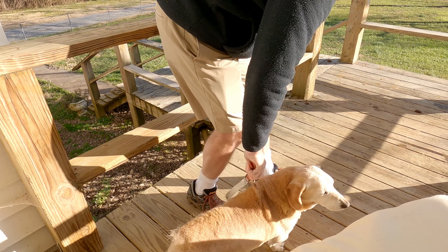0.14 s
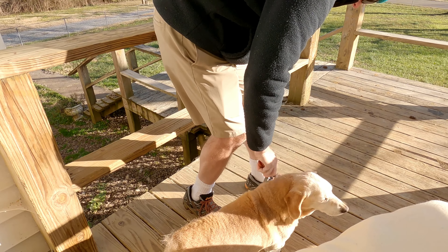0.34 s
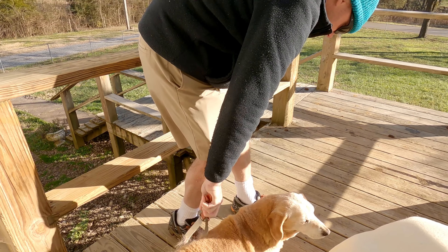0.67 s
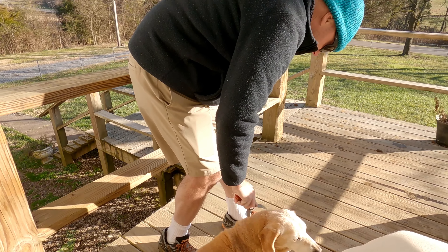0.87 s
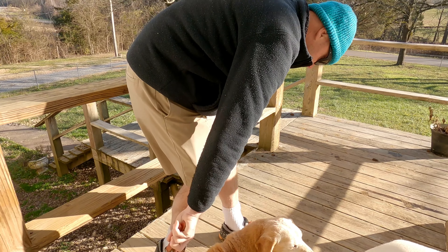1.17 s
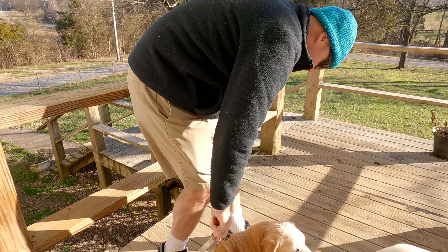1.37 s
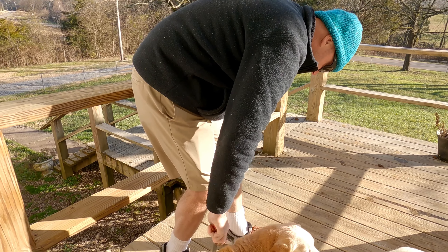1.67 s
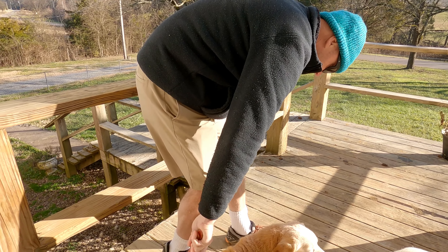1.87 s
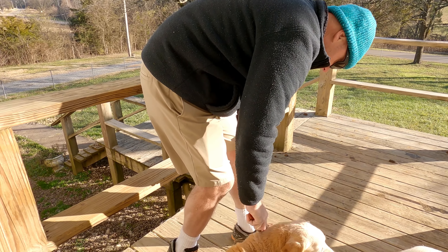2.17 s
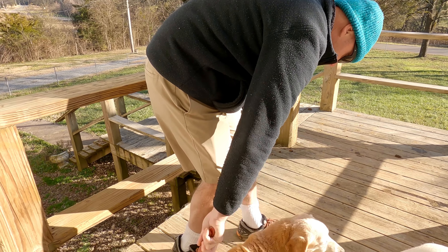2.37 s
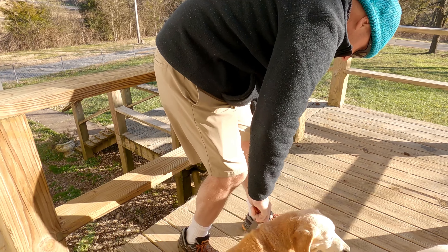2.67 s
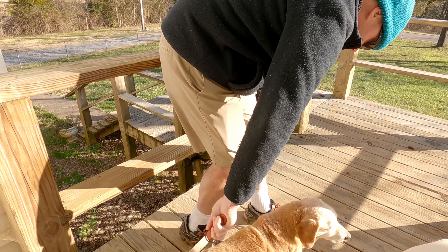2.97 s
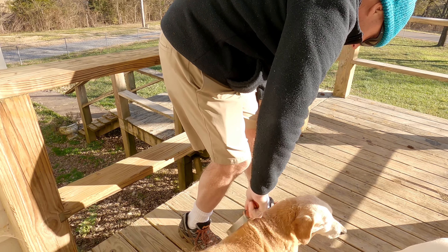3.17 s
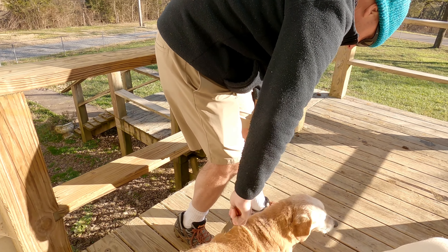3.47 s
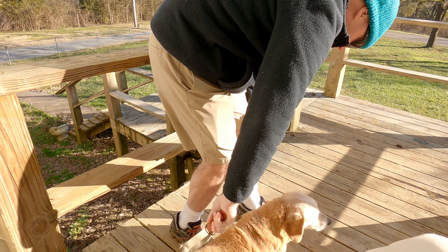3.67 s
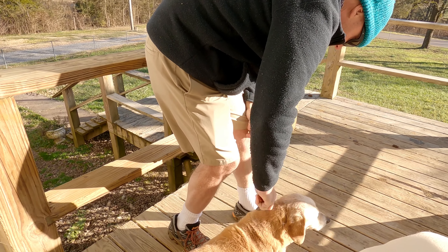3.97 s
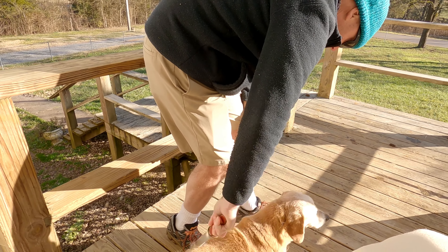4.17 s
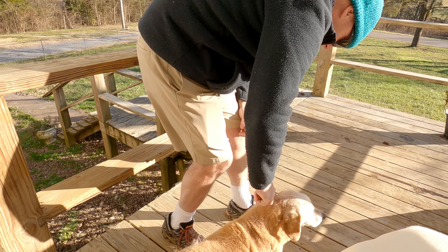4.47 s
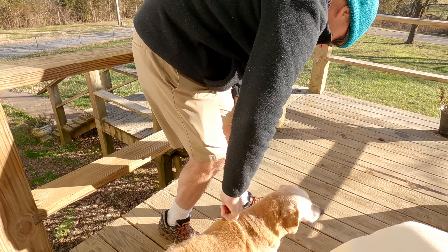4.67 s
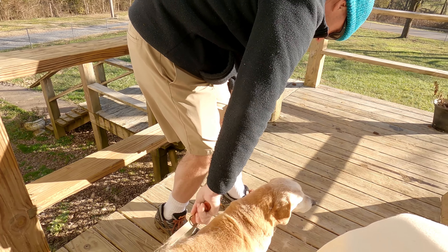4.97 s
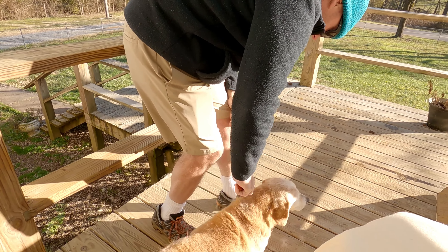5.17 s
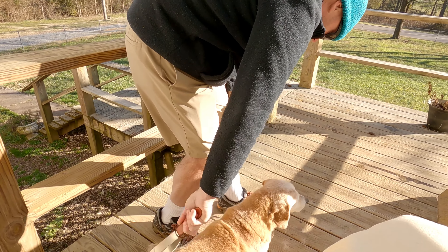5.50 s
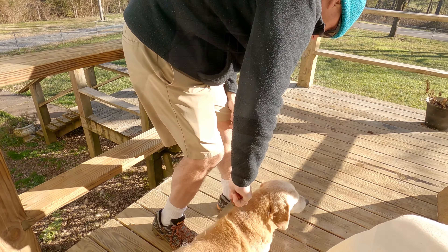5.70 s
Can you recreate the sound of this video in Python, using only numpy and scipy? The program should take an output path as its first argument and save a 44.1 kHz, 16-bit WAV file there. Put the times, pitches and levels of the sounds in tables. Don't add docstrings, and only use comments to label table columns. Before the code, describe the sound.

Close up, a metal pin comb scrapes to and fro through a dog's coat about three times a second. Each stroke hisses with dry hair and thin, high metallic ringing; caught pins ping free and the handle or collar ticks. Behind it, on an open wooden deck, small birds chirp faintly, a distant engine hums and deep traffic rumbles. The stereo microphone sits near the dog.

```python
import sys
import numpy as np
from scipy import signal
from scipy.fft import rfft, irfft
from scipy.io import wavfile
from scipy.ndimage import uniform_filter1d

SR = 44100
rng = np.random.default_rng(int(sys.argv[2]) if len(sys.argv) > 2 else 0)


def unload_audio(sound):
    columns = np.transpose(np.atleast_2d(sound))
    steps = np.round(np.clip(columns, -1, 1) * 32767)
    wavfile.write(sys.argv[1], SR, steps.astype(np.int16))


def attenuation_scalar(level_db):
    decades = np.asarray(level_db, float) / 20
    return 10 ** decades


N = 257544
SLOW = np.arange(0, N + 64, 64) / SR
FIRM_DB = -60

# pins bite t/s, hardest t/s, pins lift t/s, bite level/dB, hardest level/dB
COMB_STROKES = [(.099, .218, 0.3, -65, -61), (.396, .518, 0.58, -69.3, -58.5),
                (.744, .838, .898, -62.5, -62.7), (.985, 1.128, 1.194, -69.5, -60),
                (1.322, 1.464, 1.58, -67.7, -61.7), (1.663, 1.779, 1.825, -65.5, -57),
                (1.944, 2.041, 2.22, -72, -64), (2.213, 2.351, 2.47, -71, -56),
                (2.584, 2.677, 2.798, -62, -61), (2.893, 2.982, 3.021, -60, -55),
                (3.134, 3.258, 3.34, -67.5, -61), (3.45, 3.615, 3.642, -62.5, -57),
                (3.77, 3.824, 4, -73, -64.5), (4.0, 4.165, 4.29, -71, -57),
                (4.363, 4.412, 4.51, -66.3, -62.5), (4.61, 4.862, 4.887, -66.5, -51.5),
                (4.976, 5.137, 5.26, -72, -62.5), (5.322, 5.41, 5.525, -62, -54.5),
                (5.625, 5.776, 5.96, -70.5, -60.5)]
# t/s, half length/s, extra pressure level/dB
KNOT_TUGS = [(.1, 0.011, 2.5), (0.731, 0.013, 2), (1.06, .02, 2.5), (1.715, 0.012, 2.5),
             (1.945, 0.011, 4.5), (2.265, .02, 3), (2.59, .015, 2.5), (2.887, 0.011, 2.5), (3.0, 0.016, 1),
             (3.295, 0.01, 1), (3.62, .025, 1.5), (3.864, 0.014, 0), (4.087, 0.013, 4), (4.155, .012, 3),
             (4.674, .02, 3.5), (5.33, 0.012, 2), (5.507, 0.027, 1.5)]


def hand():
    attack_db_per_s, ease_db, release_db_per_s = (180, 288), (-15.5, -6.5), (101, 274)
    power, pull, progress = 0, 0, 0
    for k, (bite, hardest, lift, bite_db, top_db) in enumerate(COMB_STROKES):
        way = k % 2
        end_db = top_db + ease_db[way]
        times = [bite - 1, bite, hardest, lift, lift + 1]
        before_db = bite_db - attack_db_per_s[way]
        after_db = end_db - release_db_per_s[way]
        now = attenuation_scalar(2 * np.interp(SLOW, times, [before_db, bite_db, top_db, end_db, after_db]))
        power = power + now
        pull = pull + way * now
        progress = progress + now * np.interp(SLOW, [bite, lift], [0, 1])
    pressure_db = 10 * np.log10(power) + bumps_db(KNOT_TUGS)
    return fine(pressure_db), fine(pull / power), fine(progress / power)


# f/Hz, level/dB per Hz
HAIR_SPECTRUM = [(290, -33), (500, -17), (902, -1.5), (955, -6.5), (1900, -8.5), (2110, -5), (3590, -6.5),
                 (9530, -5), (12900, -12.5), (15500, -20.5)]


def hair(scratch_db, pull):
    over_db = scratch_db - FIRM_DB
    rub_db = by_way((-64, -63.5), pull) + 0.7 * over_db
    fizz_db = by_way((-67.5, -67.5), pull) + 1.4 * over_db
    tangles = evened(attenuation_scalar(0.8 * drift(0.02) + 0.6 * drift(0.002)))
    rub = attenuation_scalar(rub_db + 3.0) * noise(HAIR_SPECTRUM, 870, 6380, patchy_db=1.45, size=256)
    scratch = attenuation_scalar(scratch_db - 2.5) * noise(HAIR_SPECTRUM, 8100, 9000, patchy_db=0.0, size=256)
    fizz = attenuation_scalar(fizz_db + 6.0) * noise(HAIR_SPECTRUM, 10200, 20000, patchy_db=2.5, size=256)
    return tangles * (rub + scratch + fizz)


# f/Hz, width f/Hz, level/dB
PIN_NOTES = [(6200, 13, -0.5), (6995, 65, 2.5), (7844, 56, 1.5), (8540, 43, -2), (9150, 67, -2),
             (9990, 78, -.4), (10400, 46, -23), (10750, 70, -3.5), (11000, 110, -2), (11700, 50, -0.5),
             (12450, 50, -2), (13450, 55, -2), (13900, 80, -9), (14400, 81, -27)]


def pins(scratch_db, pull, progress):
    bite_hz = by_way((9100, 7400), pull)
    lift_hz = by_way((7360, 10400), pull)
    deepest_hz = by_way((bite_hz, lift_hz), progress)
    ring_db = by_way((-0.15, -0.7), pull)
    load = 1 + 0.0268 * uniform_filter1d(1 - pull, size=2000)
    rake_db = 2.1 * drift(0.017)
    out = np.zeros((2, N))
    for hz, width, db in PIN_NOTES:
        depth_db = -3.5 * np.minimum(((deepest_hz - hz) / 2000) ** 2, 2.5)
        grip = attenuation_scalar(db + depth_db + rake_db + 3.2 * drift(0.015))
        bend = load + 0.0047 * drift(0.066)
        plucks = grip * rng.standard_normal((2, N))
        a, b = evened(resonate(plucks, hz * bend, 1.9 * width))
        out += np.sqrt(np.mean(grip ** 2)) * np.array([a, 0.12 * a + 0.72 * b])
    loudness = np.sqrt(uniform_filter1d((out ** 2).mean(0), size=4000))
    return attenuation_scalar(scratch_db + ring_db) * out / loudness


# t/s, peak level/dB, f/Hz
PIN_SNAGS = [(.4828, -47, 7200), (1.7113, -34.5, 9040), (1.7784, -39, 11000), (2.2513, -37, 7740),
             (2.5895, -50, 7170), (2.6728, -49, 9310), (2.8679, -41, 7700), (2.8873, -32, 8440),
             (2.8913, -41, 10800), (2.8923, -36, 9140), (3.2864, -37, 7850), (3.44, -37, 6990),
             (3.8511, -40, 6940), (4.0806, -41, 7020), (4.0811, -35, 7840), (4.1425, -45, 11000),
             (4.156, -39, 9100), (4.6598, -40, 8516), (4.7303, -39, 9150), (4.7855, -34, 9960),
             (4.8534, -47, 10900), (4.8589, -48, 7850), (5.3163, -34, 8500), (5.3326, -36, 6950),
             (5.3732, -32, 9110), (5.3752, -40, 10700), (5.3767, -47, 6820), (5.4326, -46, 7900)]


def snags():
    out, t = np.zeros(N), np.arange(6000) / SR
    for s, db, hz in PIN_SNAGS:
        ring = np.sin(2 * np.pi * hz * t)
        add(out, s, attenuation_scalar(db - 14.0 - 60 * t / 0.09) * ring * np.minimum(t / 0.005, 1))
    return spread(out, wet=1.6)


# t/s, peak level/dB, f/Hz, t60/s
HANDLE_TICKS = [
    (1.08, -56, 4400, .05),
    (1.131, -57.5, 2400, .12),
    (2.015, -64, 4700, .02),
    (2.727, -48.5, 2300, .035),
    (2.728, -51, 1200, .035),
    (3.62, -59, 2400, .08),
    (4.155, -53, 9300, .03),
    (5.335, -56, 8000, .02),
]


def ticks():
    out, t = np.zeros(N), np.arange(6000) / SR
    for s, db, hz, t60 in HANDLE_TICKS:
        puff = rng.standard_normal(len(t))
        hollow = evened(resonate(puff, hz, width=0.45 * hz))
        body = hollow + 0.4 * np.sin(2 * np.pi * hz * t) + 0.2 * puff
        add(out, s, attenuation_scalar(db - 60 * t / t60) * body * np.minimum(t / 0.002, 1))
    return spread(out, wet=0.5)


# start t/s, length/s, from f/Hz, to f/Hz, level/dB
BIRD_CHIRPS = [
    (.636, 0.067, 7180, 5660, -59),
    (.682, .026, 6200, 3700, -64),
    (1.558, .03, 6650, 5900, -74),
    (1.85, 0.044, 7000, 5800, -65),
]
# start t/s, length/s, centre f/Hz, width f/Hz,
# level/dB
BUZZY_NOTES = [
    (1.98, .26, 5230, 400, -66),
    (1.51, 0.089, 6200, 90, -68),
    (2.49, .23, 4420, 400, -70),
    (3.43, .06, 6150, 90, -69),
    (3.6, 0.051, 6040, 90, -63),
    (3.82, 0.26, 4500, 150, -74),
    (3.88, 0.15, 5540, 900, -67.5),
    (4.0, 0.14, 6060, 90, -66),
    (5.02, 0.3, 2420, 110, -75),
    (5.33, 0.1, 2180, 100, -71),
]


def birds():
    out = np.zeros(N)
    for s, *note in BIRD_CHIRPS:
        add(out, s, glide(*note, soft=0.7))
    count = SR // 2
    for s, length, hz, width, db in BUZZY_NOTES:
        flutter = attenuation_scalar(1.7 * drift(0.017, count=count))
        call = flutter * resonate(rng.standard_normal(count), hz, 2.1 * width)
        shape = signal.windows.tukey(round(length * SR), 0.6)
        add(out, s, attenuation_scalar(db) * shape * evened(call[:len(shape)]))
    decay_db = -60 * np.arange(4000) / SR / 0.22
    trees = rng.standard_normal(4000) * attenuation_scalar(decay_db)
    smear = signal.oaconvolve(out, trees / np.linalg.norm(trees))[:N]
    return spread(out + 0.5 * smear, wet=1.0)


# t/s, f/Hz, level/dB
ENGINE_NOTE = [(0, 154.5, -62), (.5, 158.4, -66.5), (1.72, 157, -59.5), (1.84, 156.9, -53),
               (2.05, 159, -45), (2.25, 158.7, -44), (2.5, 155.5, -49.5), (2.88, 151.9, -51),
               (3.0, 151.4, -61.5), (3.6, 156, -65.5), (4.3, 157.1, -54), (4.8, 156, -59),
               (5.05, 155.9, -52.5), (5.3, 154.2, -59), (5.5, 156, -51), (5.84, 157.4, -73.5)]
# start t/s, length/s, from f/Hz, to f/Hz, level/dB
GEAR_WHINES = [
    (1.78, .08, 1360, 1390, -68.5),
    (3.86, 0.16, 506, 500, -67),
    (2.82, 0.24, 505, 500, -70.5),
    (.25, 1.0, 290, 395, -64.5),
    (2.0, .6, 362, 370, -66),
    (1.4, .7, 197, 130, -79),
    (3.0, 1.66, 144, 144, -58.5),
    (4.4, 1.101, 144, 130, -58),
]


def engine():
    s, notes_hz, levels_db = np.transpose(ENGINE_NOTE)
    t = np.arange(N) / SR
    hz, db = np.interp(t, s, notes_hz), np.interp(t, s, levels_db)
    second_db = -71 + 0.5 * (db - FIRM_DB)
    turn = 2 * np.pi * np.cumsum(hz * (1 + 0.001 * drift(0.05))) / SR
    first = attenuation_scalar(db + 0.49 * drift(0.064)) * np.sin(turn)
    out = np.sqrt(2) * (first + attenuation_scalar(second_db) * np.sin(2 * turn))
    for s, *note in GEAR_WHINES:
        add(out, s, glide(*note, soft=0.46))
    return out


# f/Hz, level/dB per Hz
RUMBLE_SPECTRUM = [(7.1, -30), (12, 0.5), (27, 0.5), (46, -3), (62, -6.5), (108, -27), (125, -24.5),
                   (160, -35), (280, -120)]
# t/s, half length/s, level/dB
DEEP_SWELLS = [(.26, 0.084, 2.5), (0.506, 0.078, -1), (1.093, 0.059, -2.5), (2.715, 0.24, -1.5),
               (2.943, .1, 4), (3.508, 0.068, 4), (3.774, 0.056, 3.5), (4.36, 0.054, -4), (4.84, 0.025, 8),
               (5.277, 0.042, -8), (5.43, .06, 2), (5.535, .04, -4.5), (5.8, 0.18, -1.5)]
# t/s, half length/s, level/dB
HIGH_SWELLS = [
    (.08, 0.092, -4),
    (1.05, .1, -4),
    (2.75, .3, -6),
    (3.55, 0.073, 3.5),
    (4.15, .08, 5),
    (4.5, 0.22, 4),
    (5.2, 0.061, 4),
    (4.9, .05, 1),
]


def traffic():
    deep = steady(noise(RUMBLE_SPECTRUM, 11.9, 56.8, patchy_db=1.3, size=4096), seconds=0.0626)
    upper = steady(noise(RUMBLE_SPECTRUM, 60, 112, patchy_db=2.8, size=4096), seconds=0.053)
    deep_db = -36.5 + fine(bumps_db(DEEP_SWELLS))
    upper_db = -49 + fine(bumps_db(HIGH_SWELLS))
    lull = signal.windows.tukey(N, 0.006)
    return lull * (attenuation_scalar(deep_db) * deep + attenuation_scalar(upper_db) * upper)


# f/Hz, level/dB per Hz
YARD_SPECTRUM = [(8.8, -29), (15, -1), (52, -5), (72, -9.5), (111, -18.5), (158, -22.5), (211, -26),
                 (317, -25.5), (449, -36), (2970, -51), (8690, -51.5), (15500, -73)]


def yard():
    air_db = -70
    passing = fine(bump(2.44, 0.48))
    wash = noise(YARD_SPECTRUM, 116.6, 1110, patchy_db=0.71, size=2048)
    top_hiss = noise([(1, 0), (2, 0)], 14000, 21000, patchy_db=3.0)
    air = noise(YARD_SPECTRUM, 1200, 21000, patchy_db=2.7)
    out = attenuation_scalar(-54 + 2.5 * passing) * wash
    out += attenuation_scalar(air_db - 4.0) * top_hiss
    return out + attenuation_scalar(air_db + 6 * passing) * air


# f/Hz, side minus mid level/dB
STEREO_WIDTH = [(60, -27), (130, -21), (290, -18.5), (640, -8), (1410, -6.5), (3100, 0.5), (6820, 2.5),
                (15000, -1)]


def noise(shape, lo_hz, hi_hz, patchy_db, size=1024):
    hop, hz = size // 4, np.fft.rfftfreq(size, 1 / SR)
    a, b, c, d, patches = rng.standard_normal((N // hop + 9, len(hz), 5)).T
    patches = uniform_filter1d(patches, size=8, axis=0)
    patches = evened(uniform_filter1d(patches, size=10, axis=1))
    side = attenuation_scalar(2 * np.minimum(read(STEREO_WIDTH, hz), 0))[:, None]
    same = (1 - side) / (1 + side)
    left = a + 1j * b
    right = same * left + np.sqrt(1 - same ** 2) * (c + 1j * d)
    edges = 1 / np.sqrt((1 + (lo_hz / (hz + 1)) ** 8) * (1 + (hz / hi_hz) ** 8))
    color = attenuation_scalar(read(shape, hz)[:, None] + patchy_db * patches) * edges[:, None]
    z = np.array([left, right]) * color
    sound = signal.istft(z, nperseg=size, noverlap=size - hop)[1]
    return evened(sound[:, size:size + N])


def resonate(x, hz, width):
    turn = np.exp(2j * np.pi * np.cumsum(hz * np.ones(x.shape[-1])) / SR)
    r = np.exp(-np.pi * width / SR)
    smooth = signal.lfilter([(1 - r) ** 2], [1, -2 * r, r * r], x * turn.conj())
    return 2 * (turn * smooth).real


def spread(x, wet):
    taps = rng.standard_normal((2, 400)) * attenuation_scalar(-60 * np.arange(400) / SR / 0.008)
    taps *= wet / np.linalg.norm(taps, axis=1, keepdims=True)
    taps[:, 0] = 1
    return signal.oaconvolve(x[None], taps, axes=1)[:, :N] / np.sqrt(1 + wet ** 2)


def glide(length, from_hz, to_hz, db, soft):
    hz = np.linspace(from_hz, to_hz, round(length * SR))
    tone = np.sin(2 * np.pi * np.cumsum(hz) / SR)
    return np.sqrt(2) * attenuation_scalar(db) * tone * signal.windows.tukey(len(hz), min(soft, 1))


def steady(x, seconds):
    return x / np.sqrt(uniform_filter1d((x ** 2).mean(0), int(seconds * SR)) + 0.0093)


def drift(seconds, count=N):
    size = max(int(seconds * SR), 2)
    smooth = uniform_filter1d(rng.standard_normal(count), size)
    return evened(uniform_filter1d(smooth, size))


def bump(middle, half):
    return np.exp(-((SLOW - middle) / half) ** 4)


def bumps_db(rows):
    return sum(db * bump(s, half) for s, half, db in rows)


def fine(control):
    return np.interp(np.arange(N) / SR, SLOW, control)


def by_way(pair, share):
    return pair[0] + (pair[1] - pair[0]) * share


def evened(x):
    return x / np.sqrt(np.mean(abs(x) ** 2) + 1e-20)


def read(points, hz):
    f, value = np.transpose(points)
    return np.interp(np.log(hz + 1), np.log(f + 1), value)


def add(mix, s, sound):
    part = mix[round(s * SR):][:len(sound)]
    part += sound[:len(part)]


def scene():
    pressure_db, pull, progress = hand()
    comb = hair(pressure_db, pull) + pins(pressure_db, pull, progress) + snags() + ticks()
    return comb + birds() + engine() + traffic() + yard()


def low_pass(x):
    return signal.sosfilt(signal.butter(12, 15690, fs=SR, output="sos"), x)


# f/Hz, left minus right level/dB
PORT_LEAN = [(30, 0.3), (180, .5), (550, 0.2), (1650, 0.4), (4970, 1.4), (9000, 1.5), (15000, 2.5)]


def record(dry):
    padded = np.pad(dry, ((0, 0), (2000, 2000)), mode="reflect")
    count = padded.shape[1]
    lean_db = read(PORT_LEAN, np.fft.rfftfreq(count, 1 / SR)) / 2
    ports = irfft(rfft(padded) * attenuation_scalar(np.array([lean_db, -lean_db])), count)
    return low_pass(ports[:, 2000:-2000])


dry = scene()
out = record(dry)
unload_audio(out)
```